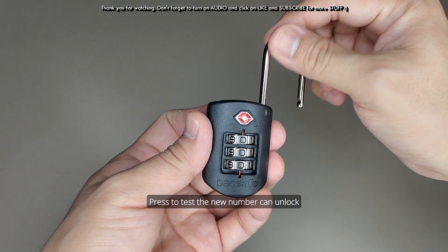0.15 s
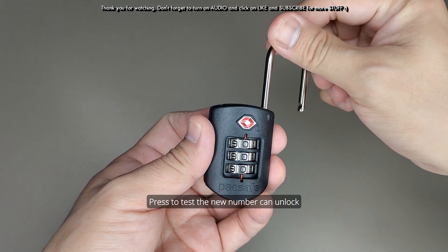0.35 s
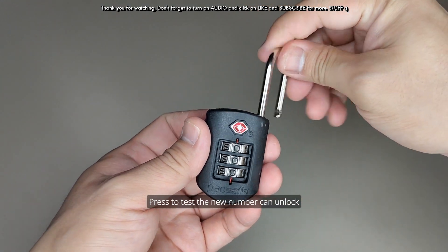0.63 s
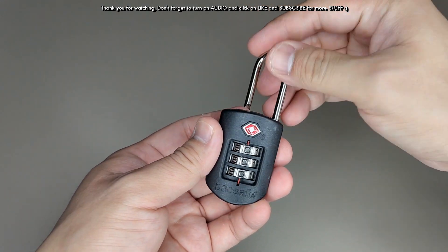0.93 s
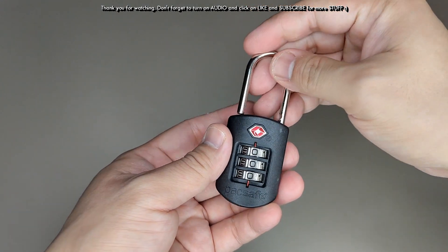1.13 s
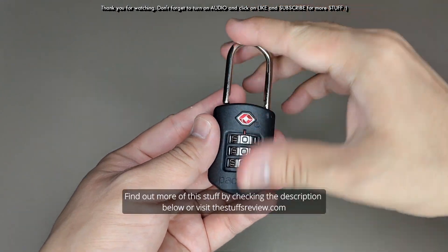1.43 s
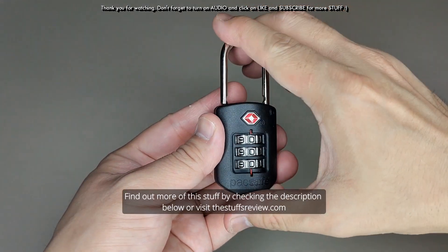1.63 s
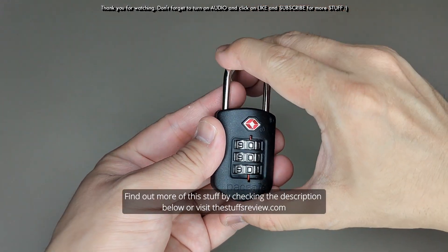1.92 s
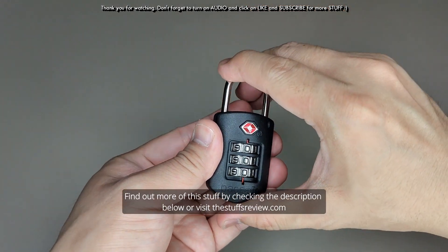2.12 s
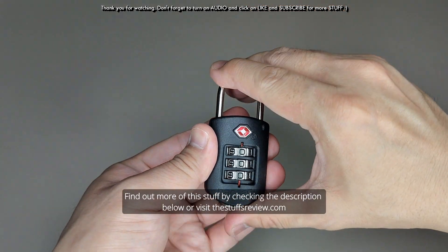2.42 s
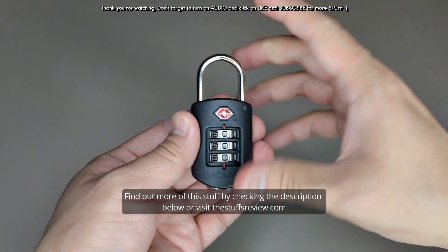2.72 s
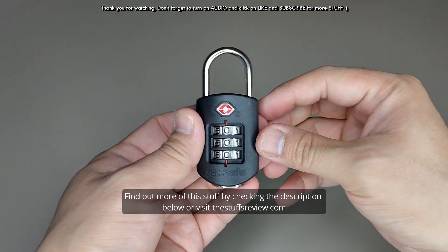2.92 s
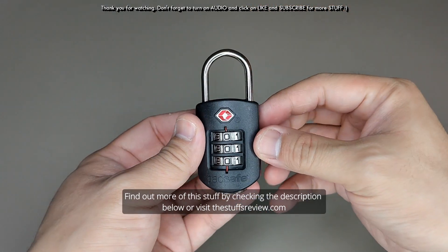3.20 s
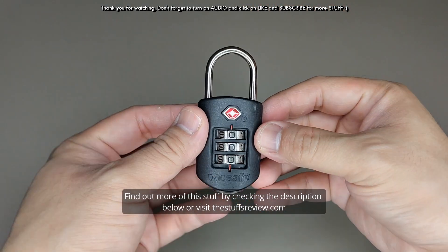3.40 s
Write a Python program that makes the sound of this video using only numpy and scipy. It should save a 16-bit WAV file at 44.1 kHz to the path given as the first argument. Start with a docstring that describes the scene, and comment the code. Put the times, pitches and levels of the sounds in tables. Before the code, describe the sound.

A small padlock handled close up in a quiet, bare room with faint low hum and rumble. Barely audible ticks from 0.5 s, a hard knock on the case at 1.17, light metallic ticks at 1.9-2.0, then a loud, crisp double-edged snap at 2.18 with a small thud, bright metallic ring and roughly half-second room tail. Softer clicks follow at 2.6 and 2.75, faint rubbing near 3.0, a dial click at 3.45.

```python
"""A small combination padlock snaps shut close to the microphones in a quiet, bare room.
Before that its shackle is swung round, knocks on the case and slides down with a few ticks; afterwards
it settles and a dial clicks. Each contact is a short burst of noise ringing a bank of resonances.
Decaying sines make the ring of the spring, filtered noise the rubbing, and sparse echoes that
thicken the room's answer; beneath lie a low electrical hum and a dull rumble."""
import sys
import numpy as np
from scipy import signal
from scipy.fft import rfft, irfft
from scipy.io import wavfile
from scipy.ndimage import uniform_filter1d

SR = 44100
rng = np.random.default_rng(int(sys.argv[2]) if len(sys.argv) > 2 else 0)


def unload_audio(sound):
    """Save the sound as a 16-bit wav file, at the path given as the first command line argument."""
    columns = np.transpose(np.atleast_2d(sound))
    # keep every value between -1 and 1, then stretch to whole-number steps
    steps = np.round(np.clip(columns, -1, 1) * 32767)
    wavfile.write(sys.argv[1], SR, steps.astype(np.int16))


N = 156555
T, HZ = np.arange(N) / SR, np.maximum(np.fft.rfftfreq(N, 1 / SR), 1)


def from_db(db):
    """Level: decibels become an amplitude gain."""
    return 10 ** (np.asarray(db) / 20)


def at_hz(points, hz):
    """Logarithmic pitch: a table is read between its points on a log-frequency axis."""
    f, v = np.transpose(points)
    return np.interp(np.log(hz), np.log(f), v)


def unit(x):
    """Normalisation: each channel is scaled to an energy of one."""
    return x / np.sqrt(np.sum(x ** 2, axis=-1, keepdims=True) + 1e-20)


def uneven(steps, size=512):
    """Random modulation: straight lines join a new random value at each whole step."""
    return np.interp(steps, np.arange(size), rng.standard_normal(size))


def panned(x, pan_db):
    """Intensity stereo: a level difference, left minus right, places a sound."""
    return x * from_db([[pan_db / 2], [-pan_db / 2]])


def add(out, start_s, x):
    """Superposition: a sound is summed into the mix from its start time."""
    i = int(start_s * SR)
    out[:, i:i + x.shape[1]] += x[:, :N - i]


def resonance(x, hz, width_hz):
    """Damped resonance: a pole pair rings at one pitch, with a peak gain of about one."""
    r = np.exp(-np.pi * width_hz / SR)
    zeros = np.array([1, 0, -1]) * (1 - r * r) / 2
    poles = [1, -2 * r * np.cos(2 * np.pi * hz / SR), r * r]
    return signal.lfilter(zeros, poles, x)


CLICK_LIKENESS = 0.69  # share of the force's energy common to both sides
CHATTER_HOLD = 4.4  # the envelope stays full until its decay has fallen by this ratio


def chatter(decay_s, size, count=4):
    """Broadband excitation: a dying noise burst, its spectrum flattened, drives all pitches alike."""
    dying = np.exp(-T[:size] / decay_s)
    shared = np.sqrt(CLICK_LIKENESS) * rng.standard_normal(size)
    force = (shared + np.sqrt(1 - CLICK_LIKENESS) * rng.standard_normal((2, size))) * dying
    for _ in range(count):
        flat = irfft(np.exp(1j * np.angle(rfft(force))))
        force = flat * np.minimum(1, CHATTER_HOLD * dying)
    return force


# radiation edges, relative to the lowest and highest resonance
BODY_LOW_RATIO, BODY_HIGH_RATIO = 0.97, 0.79


def contact(modes, level_db, tilt_db, decay_s, size=2048):
    """Modal excitation: chatter rings a body that radiates little outside its resonances."""
    force = chatter(decay_s, size)
    ring = sum(panned(from_db(db) * resonance(force, hz, width), pan) for hz, width, db, pan in modes)
    edges = [modes[0][0] * BODY_LOW_RATIO, min(modes[-1][0] * BODY_HIGH_RATIO, .45 * SR)]
    ring = signal.sosfilt(signal.butter(2, edges, "band", fs=SR, output="sos"), ring)
    # brightness tilts the spectrum above 1 kHz
    octaves = np.log2(np.maximum(np.fft.rfftfreq(2 * size, 1 / SR), 1000))
    ring = irfft(rfft(ring, 2 * size) * from_db(tilt_db * octaves))[:, :size]
    # the level sets the mean energy of the two sides
    return from_db(level_db) * ring / np.sqrt(np.sum(ring ** 2) / 2)


def clicks(events, modes):
    """Impact: separate contacts each ring the resonances of one part of the lock."""
    out = np.zeros((2, N))
    for start_s, level_db, tilt_db, decay_s, pan_db in events:
        add(out, start_s, panned(contact(modes, level_db, tilt_db, decay_s), pan_db))
    return out


def rubbing(events):
    """Friction: grainy noise in one resonance swells and fades over half a sine."""
    out = np.zeros((2, N))
    for start_s, length_s, level_db, hz, width_hz, pan_db in events:
        n = int(length_s * SR)
        grains = (rng.standard_normal((2, N)) * rng.exponential(1, N))[:, :n]
        hiss = unit(resonance(resonance(grains, hz, width_hz), hz, width_hz)) * np.sqrt(n)
        swell = np.sin(np.pi * np.arange(n) / n)
        add(out, start_s, panned(from_db(level_db) * hiss * swell, pan_db))
    return out


# spectrum of the room noise: pitch_hz, mid_density_db (per Hz)
RUMBLE_SPECTRUM = [(12, -72.5), (24, -78), (32, -82.5), (46, -68.5), (62, -78.5), (90, -80.5), (130, -87),
                   (220, -92.5), (400, -97), (600, -105), (850, -114), (1400, -112), (2200, -116.5),
                   (3200, -122), (4800, -133), (7200, -135), (8500, -141), (16000, -144)]
# likeness of the two sides: pitch_hz, correlation (0 to 1)
RUMBLE_LIKENESS = [(150, 1), (350, 1), (700, 0.25), (1400, 0.079), (5000, 0.079)]


def rumble():
    """Spatial coherence: shaped noise is the same on both sides in the bass and spreads above it."""
    alike = np.clip(at_hz(RUMBLE_LIKENESS, HZ), 0, 1)
    density = from_db(at_hz(RUMBLE_SPECTRUM, HZ)) * np.sqrt(SR / 2)
    mid, side = rfft(rng.standard_normal((2, N))) * density
    return irfft(mid + np.sqrt((1 - alike) / (1 + alike)) * side * [[1], [-1]], N)


# steady partials of the electrical hum: pitch_hz, level_db (rms before the waver)
HUM_PARTIALS = [(24.4, -56), (48.6, -54.5), (150, -58), (221, -79.5), (316.1, -73.5), (421.4, -79)]
HUM_WAVER, HUM_WAVER_HZ = 0.12, 1.4  # rms depth as a ratio, and bandwidth


def hum():
    """Amplitude modulation: steady sines waver slightly and slowly in level."""
    out = np.zeros(N)
    for hz, level_db in HUM_PARTIALS:
        slow = rfft(rng.standard_normal(N)) / (1 + (HZ / HUM_WAVER_HZ) ** 4)
        waver = unit(irfft(slow, N)) * np.sqrt(N)
        tone = np.sin(2 * np.pi * (hz * T + rng.random()))
        out += np.sqrt(2) * from_db(level_db) * (1 + HUM_WAVER * waver) * tone
    return out


# decay of the room: pitch_hz, t60_s
ROOM_T60 = [(300, 0.4), (1000, 0.832), (2100, 0.6), (4200, 0.62), (6500, 0.66), (9000, 0.6), (12500, .5),
            (15000, 0.56)]
# tone of the room: pitch_hz, relative_level_db
ROOM_COLOUR = [(200, -3), (1000, 5.5), (2300, 5), (3200, 6), (4200, 2), (5300, 0), (6700, -1), (9000, -2),
               (12500, 3.5), (15200, 4.5), (16200, -23)]
ROOM_DB, ROOM_DELAY_S, ROOM_BUILD_S = -7.5, 0.00087, 0.012
ECHOES_PER_S = 830  # at the start
ROOM_FLUTTER_DB, ROOM_FLUTTER_S = 1.8, .018  # surges of each band of the tail
ROOM_PATCHY_DB, ROOM_PATCH_HZ = 4.5, 90  # random dips along the spectrum


def room(x, count=28):
    """Reverberation: sparse echoes thicken to a diffuse tail whose decay time depends on pitch."""
    t = T[:SR]
    hz = np.maximum(np.fft.rfftfreq(SR, 1 / SR), 1)
    density = np.clip(ECHOES_PER_S * (1 + (t / ROOM_BUILD_S) ** 2) / SR, 0, 1)
    echoes = rng.standard_normal((2, SR)) * (rng.random((2, SR)) < density) / np.sqrt(density)
    patches = from_db(ROOM_PATCHY_DB * np.minimum(uneven(hz / ROOM_PATCH_HZ), 0))
    patches = patches / np.sqrt(uniform_filter1d(patches ** 2, size=700))
    coloured = rfft(echoes) * patches * from_db(at_hz(ROOM_COLOUR, hz))
    # overlapping bands, each with its own decay and flutter
    centres = np.linspace(300, 16000, count)
    tail = 0
    for centre, share in zip(centres, np.eye(count)):
        level_db = ROOM_FLUTTER_DB * uneven(t / ROOM_FLUTTER_S) - 60 * t / at_hz(ROOM_T60, centre)
        tail = tail + irfft(coloured * np.interp(hz, centres, share), SR) * from_db(level_db)
    tail = unit(tail * np.sqrt(np.clip((t - ROOM_DELAY_S) / ROOM_BUILD_S, 0, 1)))
    # each side of the sound excites its own pair of tails
    from_left = signal.fftconvolve(x[:1], tail, axes=1)
    from_right = signal.fftconvolve(x[1:], tail[::-1] * [[1], [-1]], axes=1)
    return from_db(ROOM_DB) * (from_left + from_right)[:, :N] / np.sqrt(2)


NEAR_DB, NEAR_DELAY_S, NEAR_T60_S = -15.5, .003, 0.15


def nearby(x):
    """Scattering: hands and table top return a short diffuse tail after each small click."""
    t = T[:SR // 4]
    noise = rng.standard_normal((2, len(t)))
    scatter = unit(noise * from_db(-60 * t / NEAR_T60_S) * (t > NEAR_DELAY_S))
    return from_db(NEAR_DB) * signal.fftconvolve(x, scatter, axes=1)[:, :N]


# low bump of the hands: start_s, length_s, level_db (rms before swell and pan), pitch_hz, width_hz, pan_db
HAND_BUMPS = [(2.2, .18, -47.5, 37.96, 19, 0.5)]


def hand_bump():
    """Low-frequency resonance: the hands bump after the snap, heard in the centre."""
    return rubbing(HAND_BUMPS)[0]  # the left signal serves both sides


# light rubbing of metal and fingers:
# start_s, length_s, level_db (rms before swell and pan), pitch_hz, width_hz, pan_db
RUBS = [(1.765, 0.074, -83, 7770, 1730, 7), (2.16, 0.054, -59, 8050, 2580, 7),
        (3.021, 0.057, -79, 4550, 510, -11), (3.025, 0.05, -89, 7400, 5000, 4)]


def metal_rubs():
    """Friction: metal and fingers rub lightly in short swells."""
    return rubbing(RUBS)


# a dial drops into its notch: start_s, level_db, brightness_db_per_octave, chatter_decay_s, pan_db
DIAL_CLICKS = [(3.4524, -36.5, 0.5, 0.0012, 2)]
# resonances of the dial: pitch_hz, width_hz, relative_level_db, pan_db
DIAL_MODES = [(2260, 170, -4, -21), (3140, 560, -3, 2.5), (4400, 860, 1, -7.5), (5700, 680, -25, -2),
              (7350, 1000, -17, -2), (11200, 2900, -11, 7)]


def dial():
    """Impact: a dial drops into its notch and rings its own resonances."""
    return clicks(DIAL_CLICKS, DIAL_MODES)


# duller knocks on the case and dials:
# start_s, level_db, brightness_db_per_octave, chatter_decay_s, pan_db
CASE_KNOCKS = [(1.1572, -42, 9, 0.006, 7), (1.1650, -22, -2.5, 0.00074, -2),
               (2.6100, -43.5, 3, 0.0006, -0.5), (2.7495, -32.5, 9, 0.0015, -1.5)]
# resonances of the case: pitch_hz, width_hz, relative_level_db, pan_db
CASE_MODES = [(1890, 124, -3, -1.5), (2400, 150, -15.5, -7), (3000, 300, -24, 2), (4020, 270, -7, -3.5),
              (4300, 290, 0, -7), (4750, 260, -4, 2), (5660, 530, -24, 4), (6260, 500, -12.5, 4.5),
              (7130, 130, -13, -3), (12200, 660, -21, -2)]


def knocks():
    """Impact: knocks on the case and dials ring the resonances of the case."""
    return clicks(CASE_KNOCKS, CASE_MODES)


# the shackle springs back against the latch:
# start_s, level_db, brightness_db_per_octave, chatter_decay_s, pan_db
RELEASE_CLICKS = [(2.7454, -39.5, -3.5, 0.00054, -8.5), (2.7482, -34.5, 0.5, 0.00038, 6)]
# resonances of the sprung shackle as it is let go: pitch_hz, width_hz, relative_level_db, pan_db
RELEASE_MODES = [(2923, 360, -1.5, 1.5), (5800, 580, -8, -2), (7040, 450, 4, -4), (7630, 530, 1, 2),
                 (11900, 1000, -13.5, 16), (15100, 1300, -16, 23)]


def release():
    """Elastic recoil: the shackle, let go, springs back against the latch and rings."""
    return clicks(RELEASE_CLICKS, RELEASE_MODES)


# small ticks of shackle and latch:
# start_s, level_db, brightness_db_per_octave, chatter_decay_s, pan_db
SHACKLE_TICKS = [(.545, -61, -10.5, 0.0012, -4), (.789, -55, -6, .003, 0.5), (.880, -54, -9, .007, -1),
                 (.908, -56, -7, .005, 0), (1.131, -56, -11, .002, -2), (1.9055, -35, -3, 0.002, 4.5),
                 (1.9086, -28, 2, .001, 4), (1.9765, -47, -3, .002, 1), (1.9868, -39.5, -3, 0.0012, 3.5),
                 (1.9895, -43, -4.5, .0012, 0.5), (1.9924, -36, -2, 0.0016, -5),
                 (2.0104, -34.5, 1.5, .0009, 3.5), (2.7220, -42.5, -3.5, .0007, 2),
                 (2.918, -59, -7, .001, -1)]
# resonances of the latch and shackle, rung by the snap too:
# pitch_hz, width_hz, relative_level_db, pan_db
LATCH_MODES = [(2336, 600, -4.5, -9), (3090, 500, -20.5, -5.5), (3986, 370, -4.5, -6.5),
               (4640, 600, -3, -7.5), (5100, 400, -8, -3.5), (5720, 360, -5.5, 6.5), (6210, 250, 0.5, -5),
               (6593, 320, 4, -5), (6946, 280, 2, 1), (7570, 600, -5.5, 8), (9150, 1900, -7, 9.5),
               (12200, 2500, -8.5, 6.5), (15400, 1470, -13.5, 8.5)]


def shackle_ticks():
    """Impact: small contacts ring the resonances of latch and shackle."""
    return clicks(SHACKLE_TICKS, LATCH_MODES)


CLOSE_S = 2.1843  # the thud and the spring's ring start together
# long metallic ring of spring and shackle: pitch_hz, relative_level_db, t60_s
SPRING_MODES = [(3020, -10.5, .6), (3934, 0, .6), (5141, -9, .6), (5733, -7.5, .55), (6159, -3.5, .55),
                (6530, -3, .6), (6330, -0.5, 0.62), (6570, -2, .6), (6700, -1.5, 0.63), (6800, -2, 0.79),
                (7470, -6, 0.545), (9350, -9.5, .5), (12436, -0.5, .45), (14300, -14, .4)]
SPRING_DB, SPRING_PHASE_TURNS = -55.5, .15  # phase spread between the sides


def spring():
    """Free vibration: spring and shackle ring on; close modes beat, their phases differing by side."""
    out, t = np.zeros((2, N)), T[:SR]
    for hz, db, t60 in SPRING_MODES:
        turns = rng.random() + SPRING_PHASE_TURNS * rng.standard_normal((2, 1))
        decay = from_db(SPRING_DB + db - 60 * t / t60)
        add(out, CLOSE_S, decay * np.sin(2 * np.pi * (hz * t + turns)))
    return out


# low resonances of the jolted case: pitch_hz, width_hz, relative_level_db, pan_db
THUD_MODES = [(105, 59, 5, 0), (175, 130, 6, 3), (320, 240, -1, -6), (557, 140, -5.5, 2.5),
              (980, 200, -6, 3), (1350, 250, -5.5, 1.5), (1620, 240, -7, -2)]
THUD_DB, THUD_DECAY_S = -21, 0.00044


def thud():
    """Momentum transfer: the case jolts in the hand as the latch closes, heard in the centre."""
    out = np.zeros((2, N))
    jolt = contact(THUD_MODES, THUD_DB, 0, THUD_DECAY_S)
    add(out, CLOSE_S, jolt[:1])  # the left signal serves both sides
    return out


# the shackle snaps into the latch, a run of contacts:
# start_s, level_db, brightness_db_per_octave, chatter_decay_s
SNAP_CONTACTS = [(2.1803, -19.5, 0, 0.0007), (2.1817, -11, 0.5, 0.0009), (2.1833, -20, 3, .0006),
                 (2.1839, -9.5, -0.5, 0.0009), (2.1846, -4, 0.5, .0013)]
SNAP_PAN_DB = 1


def snap():
    """Multiple impact: a quick run of contacts rings latch and shackle as the shackle goes home."""
    out = np.zeros((2, N))
    for start_s, level_db, tilt_db, decay_s in SNAP_CONTACTS:
        add(out, start_s, panned(contact(LATCH_MODES, level_db, tilt_db, decay_s), SNAP_PAN_DB))
    return out


RIGHT_LAG_S = .000052  # the lock is a little nearer to the left microphone


def placed(x):
    """Time-of-arrival stereo: the direct sound reaches the right side slightly later."""
    return irfft(rfft(x) * np.exp(-2j * np.pi * HZ * RIGHT_LAG_S * np.array([[0], [1]])), N)


# small ticks and knocks on the case reach the room less than the snap does
TICK_ROOM_DB, KNOCK_ROOM_DB = -7, -13.5


def scene():
    """Superposition: the lock, its reverberation, the hands and the room's own sound add up."""
    latch = snap() + thud()
    ticks = shackle_ticks() + release() + metal_rubs()
    case = knocks() + dial()
    wet = room(latch + from_db(TICK_ROOM_DB) * ticks + from_db(KNOCK_ROOM_DB) * case)
    direct = placed(latch + ticks + case + nearby(ticks + case))
    return direct + spring() + wet + hand_bump() + rumble() + hum()


CUTOFF_HZ = 16500


def record(dry):
    """Band limiting: an elliptic low-pass cuts the top steeply."""
    return signal.sosfilt(signal.ellip(10, .1, 70, CUTOFF_HZ, fs=SR, output="sos"), dry)


dry = scene()
out = record(dry)
unload_audio(out)
```